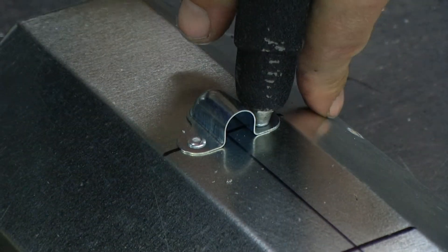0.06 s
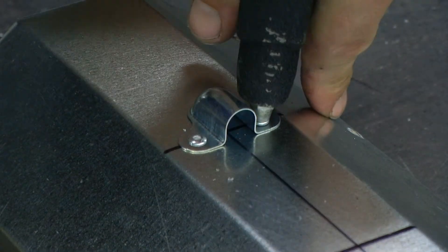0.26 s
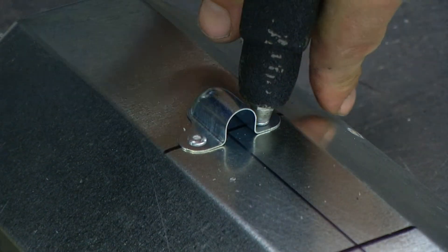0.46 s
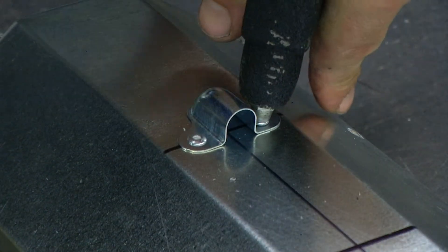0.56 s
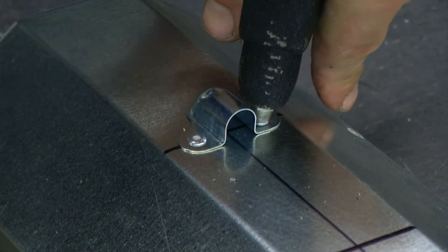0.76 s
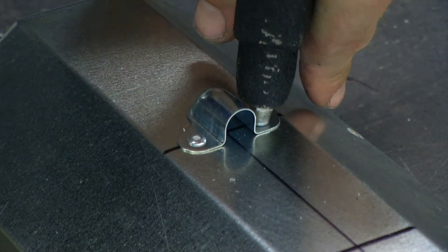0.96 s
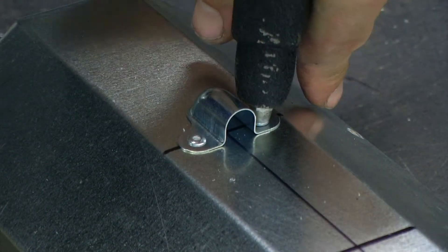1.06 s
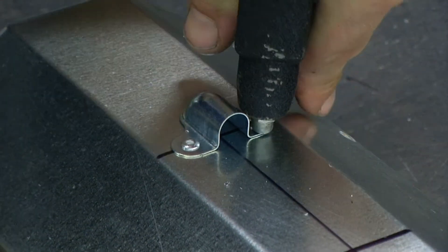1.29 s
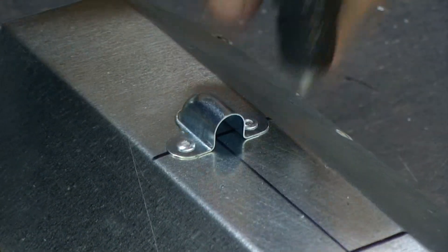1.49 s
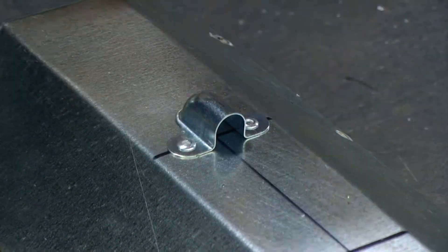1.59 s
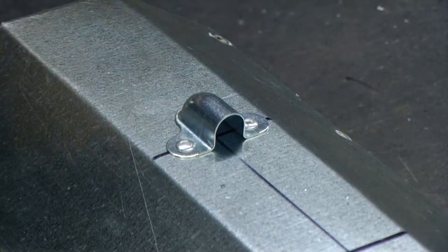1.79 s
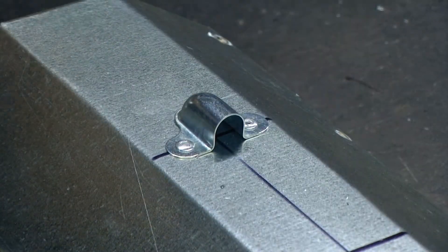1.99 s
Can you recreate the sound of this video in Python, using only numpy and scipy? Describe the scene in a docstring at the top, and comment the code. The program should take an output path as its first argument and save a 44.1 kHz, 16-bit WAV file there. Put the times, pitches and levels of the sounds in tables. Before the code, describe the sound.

Close up in a quiet workshop, a hand riveter gives loud metallic clacks that make a steel tube ring. The rivet's pin breaks with a sharp snap, followed by soft handling bumps and a faint tink.

```python
"""A hand riveter fixes a steel clip to a square steel tube, close to the microphone in a quiet workshop.
First its jaws slip and ping under load, amid sharp ticks, and each clack excites the tube's modes.
Then the mandrel snaps, and a long bright wash dies away in steel and room. Last, the tool is lifted off
with dull bumps, handling rumble, a faint slide and a tink of the loose mandrel.
Along the way, the loudest blows overload the recorder."""
import sys
import numpy as np
from scipy import signal
from scipy.fft import rfft, irfft, next_fast_len
from scipy.io import wavfile

SR = 44100
rng = np.random.default_rng(int(sys.argv[2]) if len(sys.argv) > 2 else 0)


def master_out(mix):
    """Clip the mix to full scale and print it as 16-bit PCM to the path in sys.argv[1]."""
    frames = np.transpose(np.atleast_2d(mix))
    ceiling = np.clip(frames, -1, 1)
    pcm = np.round(ceiling * 32767).astype(np.int16)
    wavfile.write(sys.argv[1], SR, pcm)


N = 90404

# Levels are relative, spectra are densities, and T60 is the time taken to decay by 60 dB. Clacks: slips of the
# # jaws, a rebound of the tool at 0.387 s, and at 0.846 s a clattering bump of the tool: t/s, knock/dB, knock
# pitch # ratio, clatter/dB, crack/dB, tube ring/dB, low hum/dB
CLACKS = [(-.025, -43, 1, -29, -24, -35.5, -36.5), (0.192, -25.5, 1.02, -31, -42, -43, -46),
          (0.2027, -25, 1, -32, -33.5, -49, -8), (0.2179, -14, 1.08, -14.5, -21.5, -39, -50),
          (0.2346, -1.5, 1.022, -12, -13.5, -16, -54), (0.369, -1.5, .96, -12.5, -17, -22, -7),
          (.387, -27, 1, -13, -20, -33, -50), (.7400, -28, 1, -26.5, -50, -38.5, -34.5),
          (.846, -17.5, .98, -30, -51, -32.5, -27)]
# Short resonances of the tool on the tube, and long modes of the tube: f/Hz, level/dB, T60/s
KNOCK_MODES = [(439, -11, 0.072), (490.4, 2, 0.096), (509, -18, .1), (931, -16, 0.12), (1108, -20, .15),
               (1182.6, -11, 0.12), (2020, -24, 0.22), (2990, -23.5, 0.17)]
TUBE_MODES = [(292.9, -8.5, 0.93), (443, -31, 0.5), (495, -1, 0.32), (522.7, 5.5, 0.38), (577, 1, 0.69),
              (601, -2, 0.39), (685, -0.5, 0.27), (944, -27, 0.23), (1097, -8, 0.36), (1208, -16.5, 0.71),
              (1334, -18.5, 0.47), (1340, -12, 0.77), (1570, -13.5, 0.46), (1880, -12.5, 0.58),
              (2083, -20, .55), (2124, -20.5, 0.99), (3030, -25, 0.61)]
# Spectra of a clack's rattle, dense afterring and crack: f/Hz, level/dB
CLATTER_SPECTRUM = [(100, -45), (260, -28), (350, 8.5), (560, 0), (760, -6), (1000, 0.5), (1220, -1),
                    (1600, -9), (2000, -4.5), (2450, -28), (3050, -20.5), (3700, -25), (4300, -31),
                    (5200, -42), (15000, -64)]
AFTERRING_SPECTRUM = [(100, -35), (250, 9.5), (560, 2.5), (790, -11), (1000, -6), (1250, -5), (1650, -17),
                      (2080, -10), (2400, -21), (3100, -20), (3650, -20), (4250, -22), (5200, -38),
                      (12000, -48)]
CRACK_SPECTRUM = [(100, -35), (500, -18), (1500, 15), (4000, 1.5), (6000, -4), (10000, -12), (15500, -23)]
# Spectra of the quiet workshop and the handling rumble: f/Hz, level/dB
WORKSHOP_SPECTRUM = [(15, -44), (25, -6.5), (140, 5.5), (253, 3.5), (340, 2.5), (378, 3.5), (4370, -23.5),
                     (5140, -22), (15500, -28.5)]
RUMBLE_SPECTRUM = [(20, -29), (45, -18), (75, -2.5), (150, 0), (240, 0), (400, -2), (800, -15.5),
                   (2000, -24.5), (8000, -67)]
# Course of the handling rumble: t/s, level/dB
RUMBLE_ENVELOPE = [(0, -43.5), (.2, -41.5), (.6, -40), (.83, -44.5), (.89, -32), (.96, -45.5), (1.15, -57),
                   (1.35, -45), (1.5, -32), (1.61, -23), (1.81, -30.5), (1.94, -32), (2.05, -28.5)]
# Sharp, bright clicks and ticks: t/s, level/dB, f/Hz, half-width/octaves, T60/s
# The one at 0.249 s is a crackle of recorder overload.
SHARP_TICKS = [(0.24, -12.5, 11000, 2, 0.0096), (0.2486, -12, 11000, 1.8, .004),
               (0.3856, -29.5, 9650, 0.22, 0.085), (.281, -47, 11000, .5, .015),
               (0.826, -36.5, 3030, 0.22, .025), (.841, -55.5, 8800, .12, 0.051),
               (.867, -54, 8200, 0.28, .04), (.881, -41.5, 8240, .1, 0.013),
               (1.747, -46, 11500, 0.64, 0.031), (1.909, -35, 6640, 0.38, 0.019)]
# Bites of the jaws: t/s, level/dB
JAW_BITES = [(0.3694, -13.5), (.7400, -48)]
# Modes of the jaws: f/Hz, level/dB, T60/s
JAW_MODES = [(2986, -10, 0.19), (3270, -12.5, 0.12), (4182, 2, 0.061), (4242, -3, .05), (4230, -19, .04),
             (4500, -11, .08), (4030, -37, 1)]
# Soft contacts of tool and work: t/s, level/dB, rise/s, T60/s
TOOL_BUMPS = [(.828, -22, 0.0018, 0.13), (0.844, -18, 0.0081, 0.18), (1.519, -9, 0.0073, 0.18),
              (1.547, -13.5, 0.0071, 0.14), (1.641, -32, .002, .04), (1.661, -17.5, 0.0026, .14),
              (1.71, -26, 0.0044, 0.18), (1.778, -23, 0.0044, 0.28), (1.991, -34.5, .008, 0.32)]
# Spectrum of those contacts: f/Hz, level/dB
BUMP_SPECTRUM = [(60, -28), (200, -15), (340, 6), (520, 4.5), (620, 0), (720, -8), (850, -13.5),
                 (1020, -7.5), (1500, -26.5), (2000, -17.5), (2500, -35), (3100, -26), (5000, -50),
                 (15000, -76)]
# Shifts of the grip: t/s, level/dB, f/Hz, T60/s
HAND_THUMPS = [(.876, -23, 116, .14), (1.569, -26, 128, 0.12), (1.875, -22, 73, 0.18),
               (1.974, -23, 82, 0.24)]
# Spectra of the mandrel's fracture and of its bright tail: f/Hz, level/dB
SNAP_SPECTRUM = [(18, -51), (30, -22.5), (443, -12.5), (518, -3), (747, -21), (920, -7), (1130, -15.5),
                 (1230, -6), (1440, -18), (2070, -12.5), (2300, -21.5), (2830, -19.5), (4780, -29),
                 (6370, -27.5), (8940, -29), (9930, -28.5), (15500, -30.5)]
WASH_SPECTRUM = [(60, -30), (200, -9.5), (310, 15.5), (500, 0), (750, -1.5), (1100, -0.5), (2000, -7),
                 (3200, -6), (4600, -14), (8500, -20), (10400, -9.5), (12000, -22), (15500, -32)]
# Modes of the riveter: f/Hz, level/dB, T60/s
RIVETER_MODES = [(373, -27, 0.18), (512, -21.5, 0.27), (615, -21, 0.13), (923, -15, 0.18),
                 (1263, -10, 0.18), (1569, -12, 0.15), (1918, -17.5, 0.32), (2136, -16.5, 0.19),
                 (2280, -23, 0.14), (2720, -22, 0.24), (9840, -13, 0.095), (10400, -20, .09)]
# Reverberation time of steel and room: f/Hz, T60/s
WASH_DECAY = [(300, 0.87), (1000, 0.89), (3000, 2.08), (6000, 1.8), (10500, 0.92), (14000, 0.85)]
# Course of the tool's slide: t/s, level/dB
SLIDE_ENVELOPE = [(1.84, -87), (1.94, -51), (2.04, -46.5)]
# Spectrum of the sliding hiss: f/Hz, level/dB
SLIDE_SPECTRUM = [(500, -2), (3000, 0), (7000, -9), (10500, -4), (12300, -7), (15500, -15)]
# Modes of the loose mandrel: f/Hz, level/dB, T60/s
MANDREL_MODES = [(1760, -4.5, 0.025), (2700, -0.5, 0.022), (2790, -3.5, 0.023), (3560, -7.5, 0.022),
                 (4140, -5, 0.018), (4650, -14, .025)]
# Stereo width: f/Hz, side over mid/dB
STEREO_WIDTH = [(100, -49), (500, -49), (2000, -46), (5000, -38.5), (10000, -28), (14000, -6)]

SNAP_S = 1.1832  # the mandrel breaks


def amp(db):
    """Amplitude grows tenfold for every 20 dB."""
    return 10 ** (np.asarray(db) / 20)


def along(points, hz):
    """Interpolation of (f/Hz, value) points on a logarithmic frequency axis."""
    freqs, values = np.transpose(points)
    return np.interp(np.log(hz + 1), np.log(freqs + 1), values)


def envelope(points):
    """Interpolation of (t/s, level/dB) points gives a gain for each sample."""
    return amp(np.interp(np.arange(N) / SR, *np.transpose(points)))


def filtered(x, gain):
    """Linear filtering multiplies the spectrum by gain(f)."""
    size = next_fast_len(N + 8192)
    hz = np.fft.rfftfreq(size, 1 / SR)
    return irfft(rfft(x, size) * gain(hz), size)[..., :N]


def stereo_noise(gain):
    """Sum and difference of a unit-rms mid and a weaker side make noise that is wider in the treble."""
    mid = filtered(rng.standard_normal(N), gain)
    side = filtered(rng.standard_normal(N), lambda hz: gain(hz) * amp(along(STEREO_WIDTH, hz)))
    return np.array([mid + side, mid - side]) / np.std(mid)


def noise(spectrum):
    """White noise takes on the spectrum of its filter."""
    return stereo_noise(lambda hz: amp(along(spectrum, hz)))


def band(centre_hz, octaves):
    """Band-pass noise falls to half amplitude this many octaves from its centre."""
    return stereo_noise(lambda hz: 1 / (1 + (np.log2((hz + 1) / centre_hz) / octaves) ** 2))


def since(onset):
    """Causality: elapsed time in seconds is zero until the onset."""
    return np.maximum(np.arange(N) / SR - onset, 0)


def strike(onset, rise, t60):
    """After an impact, vibration builds up and damping makes it decay exponentially; times in seconds."""
    t = since(onset)
    return (1 - np.exp(-t / rise)) * np.exp(-np.log(1000) * t / t60)


def mode(onset, hz, rise, t60):
    """A single mode vibrates freely as a damped sinusoid."""
    return strike(onset, rise, t60) * np.sin(2 * np.pi * hz * since(onset))


def ring(onset, modes, rise, scatter_db=1.5):
    """Superposition: a struck body sounds the sum of its modes, whose levels vary from blow to blow."""
    gains = amp(scatter_db * rng.standard_normal(len(modes)))
    return sum(gain * amp(db) * mode(onset, hz, rise, t60) for gain, (hz, db, t60) in zip(gains, modes))


def tube_hum(onset, beat_hz=13.5):
    """Beating: the tube's lowest pair of modes trade energy, so the hum swells and sinks."""
    return mode(onset, hz=343, rise=0.0025, t60=0.62) * np.sin(np.pi * beat_hz * since(onset))


def jaw_clacks():
    """Impact excitation: each clack cracks, knocks and rings the tube; its noises add in power."""
    tones, clatter, afterring, crack = np.zeros((4, N))
    for onset, knock_db, pitch, clatter_db, crack_db, ring_db, hum_db in CLACKS:
        knock_modes = [(hz * pitch, db, t60) for hz, db, t60 in KNOCK_MODES]
        tones += amp(knock_db) * ring(onset, knock_modes, rise=0.0024)
        tones += amp(ring_db) * ring(onset, TUBE_MODES, rise=0.0033)
        tones += amp(hum_db) * tube_hum(onset)
        clatter = np.hypot(clatter, amp(clatter_db) * strike(onset, rise=0.0025, t60=0.21))
        afterring = np.hypot(afterring, amp(clatter_db - 15) * strike(onset, rise=0.0089, t60=0.99))
        edge = strike(onset, rise=0.000067, t60=0.012)
        spray = amp(-5.5) * strike(onset, rise=0.00077, t60=0.086)
        crack = np.hypot(crack, amp(crack_db) * (edge + spray))
    return (tones + clatter * noise(CLATTER_SPECTRUM) + afterring * noise(AFTERRING_SPECTRUM)
            + crack * noise(CRACK_SPECTRUM))


def workshop():
    """Stationary noise forms the quiet floor of the room."""
    return amp(-46.5) * noise(WORKSHOP_SPECTRUM)


def handling_rumble():
    """Amplitude modulation: low noise rises and falls as the tool is handled."""
    return envelope(RUMBLE_ENVELOPE) * noise(RUMBLE_SPECTRUM)


def sharp_ticks():
    """Band-limited transients: brief bursts of noise are heard as bright clicks, each in its own band."""
    return sum(amp(db) * strike(onset, rise=0.00026, t60=t60) * band(hz, octaves)
               for onset, db, hz, octaves, t60 in SHARP_TICKS)


def jaw_pings():
    """Free vibration: the jaws ring as they bite, and closely spaced modes linger as a shimmer."""
    shimmer = amp(-35) * band(4130, octaves=0.11)
    return sum(amp(db) * (ring(onset, JAW_MODES, rise=0.00029) + strike(onset, rise=0.005, t60=1) * shimmer)
               for onset, db in JAW_BITES)


def tool_bumps():
    """Soft contacts with the work excite little treble; being incoherent, they add in power."""
    power = sum((amp(db) * strike(onset, rise, t60)) ** 2 for onset, db, rise, t60 in TOOL_BUMPS)
    return np.sqrt(power) * noise(BUMP_SPECTRUM)


def hand_thumps():
    """Heavy damping: each shift of the grip dies within a few low cycles."""
    return sum(amp(db) * mode(onset, hz, rise=0.0092, t60=t60) for onset, db, hz, t60 in HAND_THUMPS)


def mandrel_snap():
    """Fracture releases elastic energy as a broad burst that rings riveter and tube."""
    burst = amp(1.5) * strike(SNAP_S, rise=0.0041, t60=0.14) * noise(SNAP_SPECTRUM)
    riveter = ring(SNAP_S, RIVETER_MODES, rise=0.006)
    tube = amp(-26) * ring(SNAP_S, TUBE_MODES, rise=0.025)
    return burst + riveter + tube


def snap_wash():
    """Reverberation: the snap rings on densely in steel and room, longest near 3 kHz."""
    hz, t, spectra = signal.stft(noise(WASH_SPECTRUM), SR, nperseg=256)
    age = np.maximum(t - SNAP_S, 0)
    decay = np.exp(-np.log(1000) * age / along(WASH_DECAY, hz)[:, None])
    _, tail = signal.istft(spectra * decay, SR, nperseg=256)
    build_up = 1 - np.exp(-since(SNAP_S) / 0.018)
    return amp(-17) * build_up * tail[:, :N]


def tool_slide():
    """Sliding friction gives a faint hiss as the tool leaves."""
    return envelope(SLIDE_ENVELOPE) * noise(SLIDE_SPECTRUM)


def mandrel_tink():
    """A light impact on the tool briefly excites the modes of the loose mandrel."""
    return amp(-21.5) * ring(onset=1.909, modes=MANDREL_MODES, rise=0.00054)


def scene():
    """Superposition: the pressures of all sources add at the microphone."""
    return (jaw_clacks() + workshop() + handling_rumble() + sharp_ticks() + jaw_pings() + tool_bumps()
            + hand_thumps() + mandrel_snap() + snap_wash() + tool_slide() + mandrel_tink())


def record(dry, low_cut_hz=20, top_hz=15650):
    """Band limits and saturation: the microphone sheds deep bass, the recorder peaks and top treble."""
    low_cut = signal.butter(2, low_cut_hz, "highpass", fs=SR, output="sos")
    overloaded = np.clip(signal.sosfilt(low_cut, dry), -1, 1)
    return filtered(overloaded, lambda hz: 1 / np.hypot(1, (hz / top_hz) ** 120))


dry = scene()
out = record(dry)
master_out(out)
```